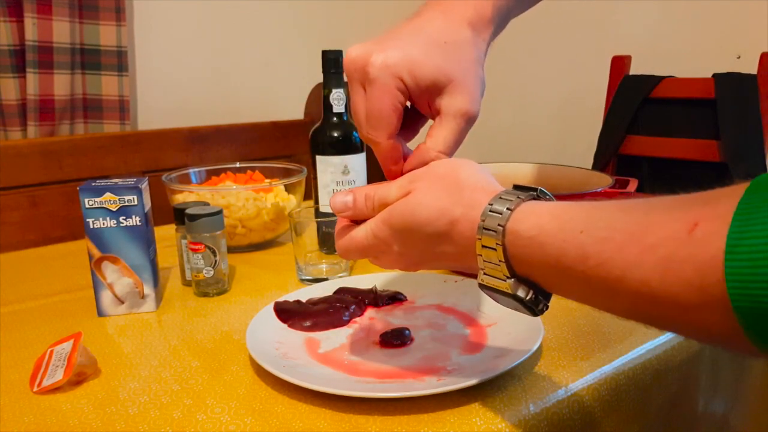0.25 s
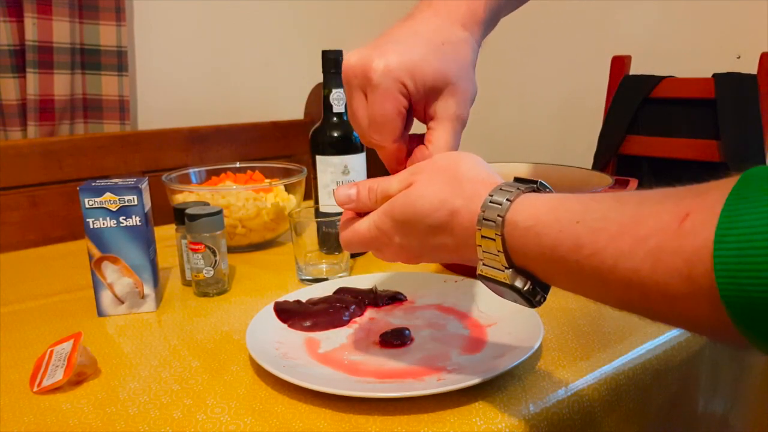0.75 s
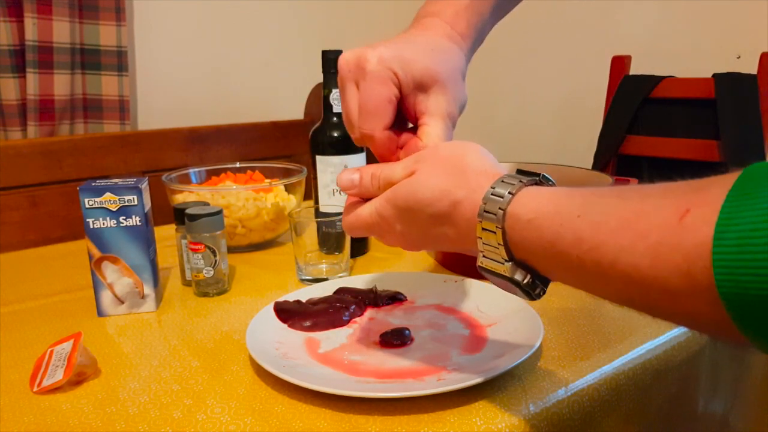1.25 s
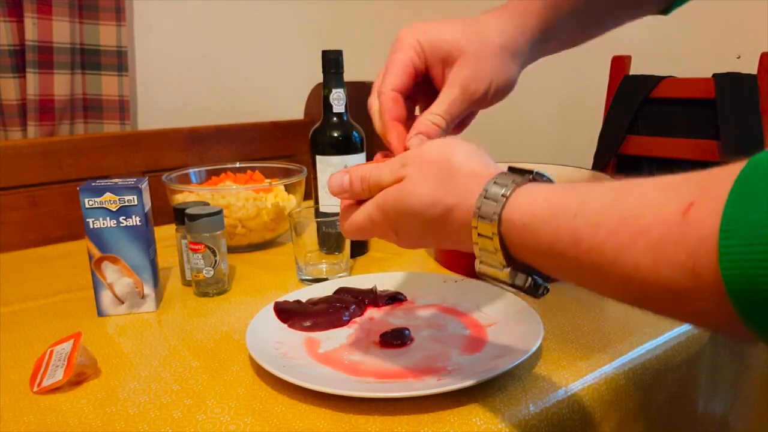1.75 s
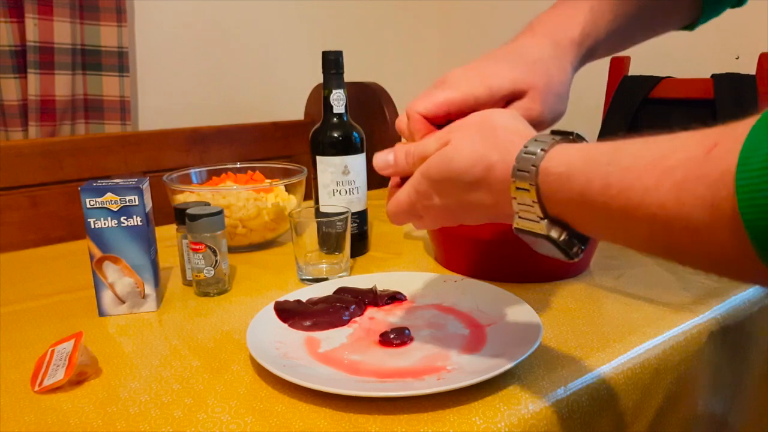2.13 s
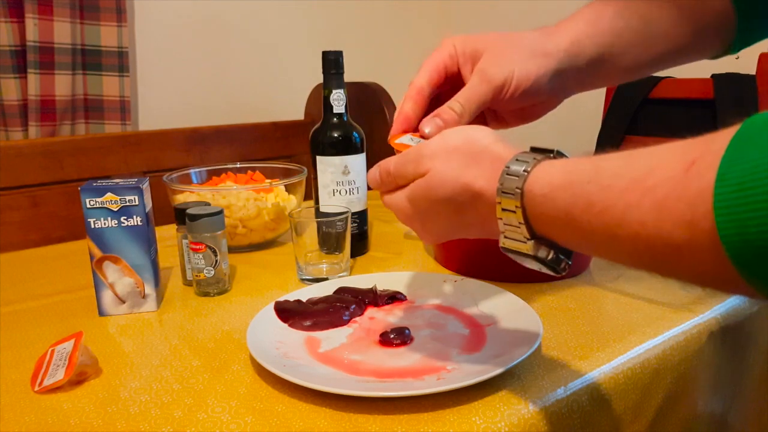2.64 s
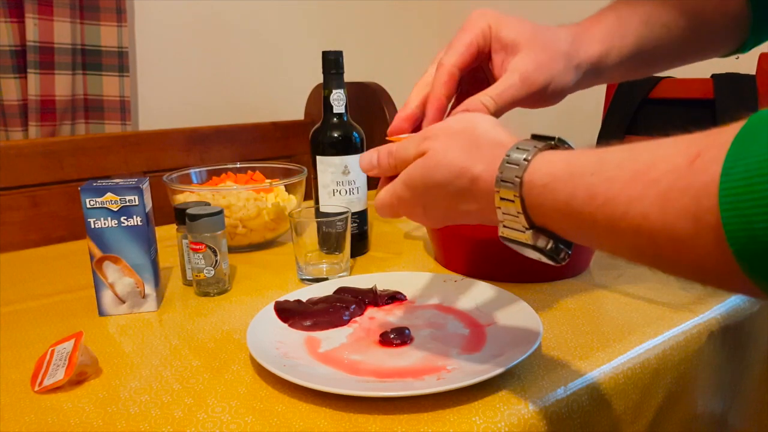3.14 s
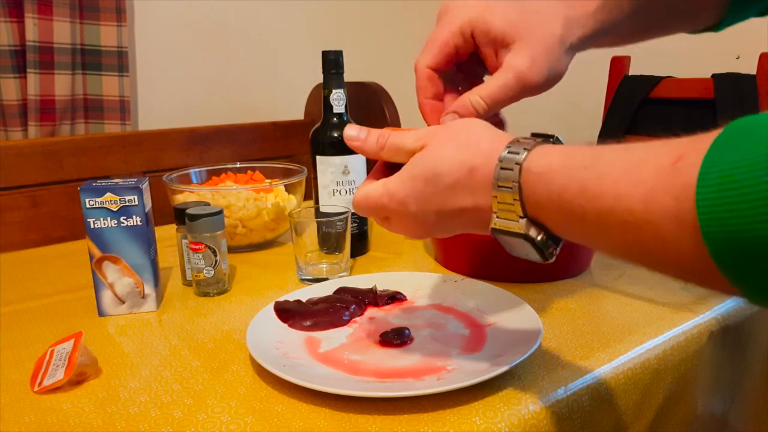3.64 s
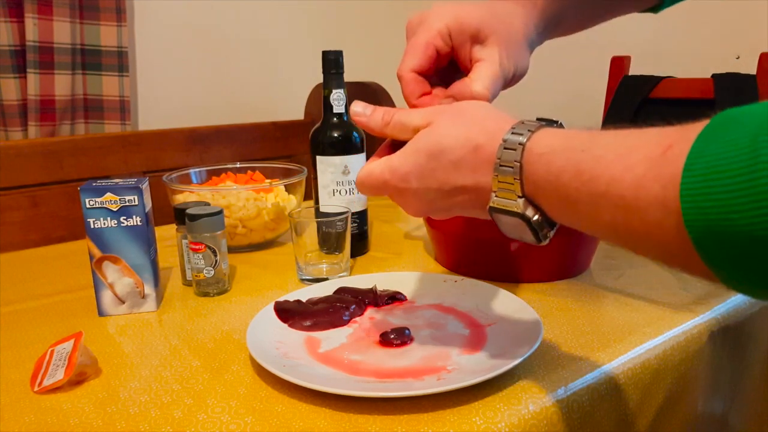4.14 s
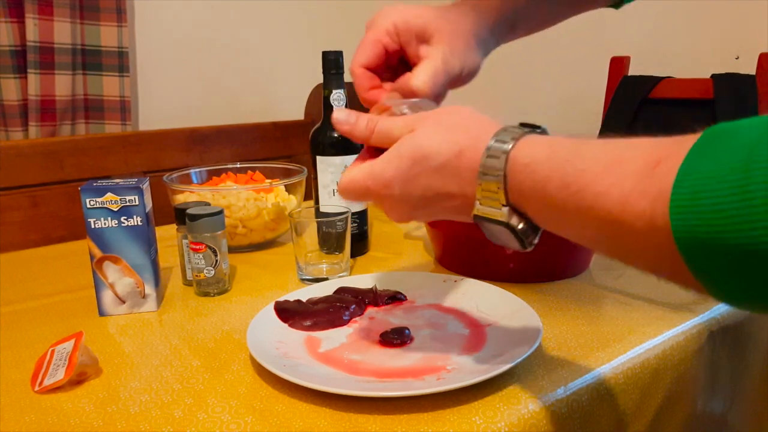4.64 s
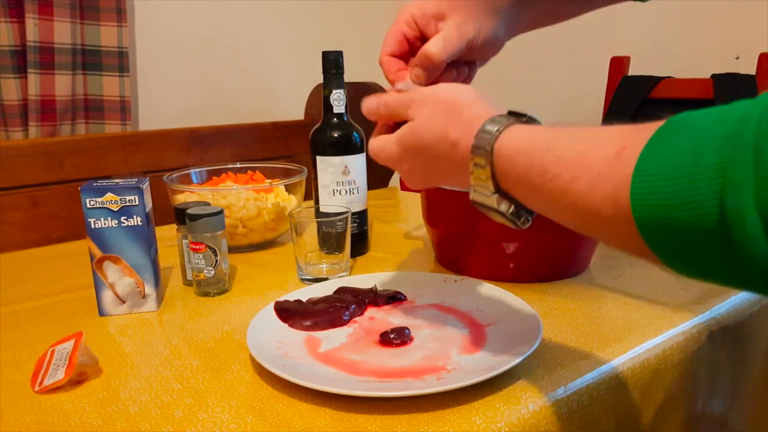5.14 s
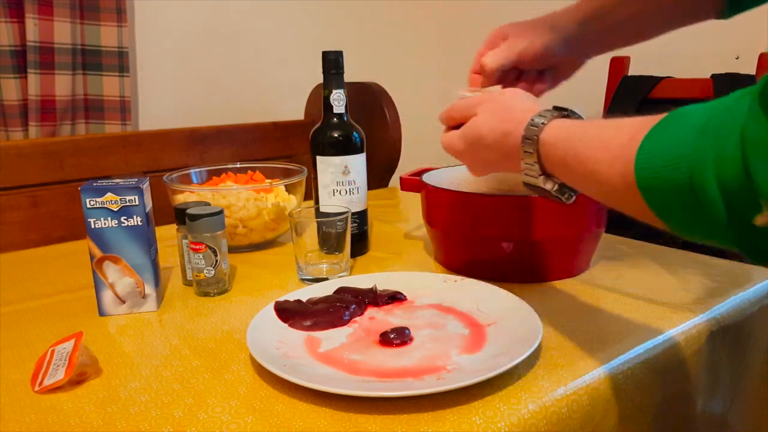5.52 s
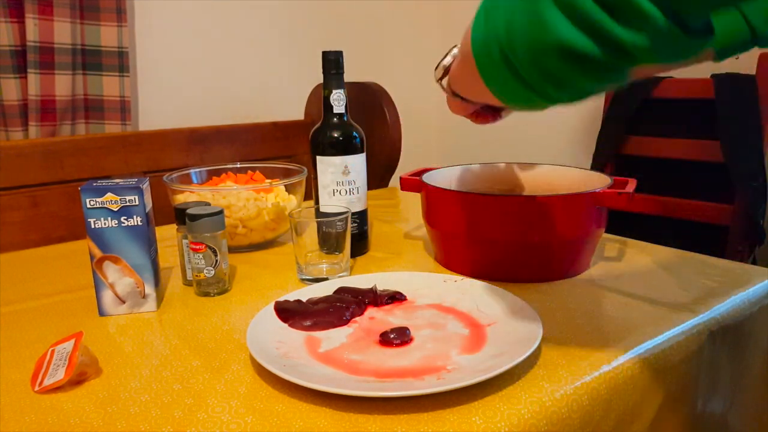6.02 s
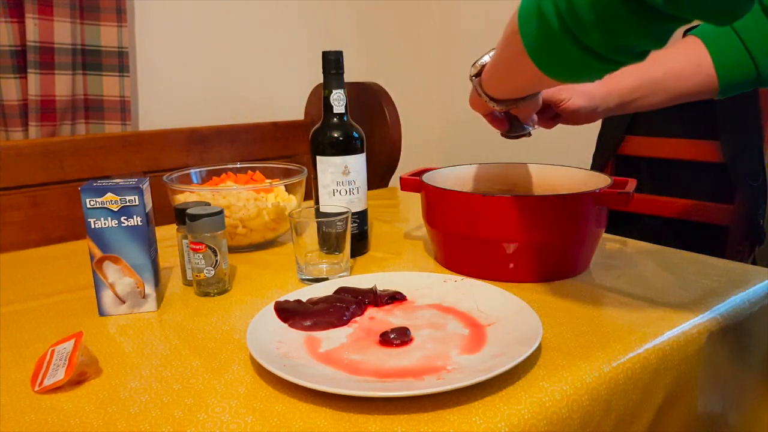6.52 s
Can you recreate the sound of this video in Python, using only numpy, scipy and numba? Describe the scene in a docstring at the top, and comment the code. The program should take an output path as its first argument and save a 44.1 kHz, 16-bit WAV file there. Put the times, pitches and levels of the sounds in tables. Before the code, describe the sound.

Stiff little wrapper crinkles and snaps close by in a quiet kitchen, with dense crackling around three seconds and one sharp tear.

```python
"""A small kitchen, two-port microphone a metre from hands that unwrap a crumbly cube over a table.
Throughout: house rumble, narrow bands of appliance hum, a steady whine and microphone hiss.
From 0.35 s creases of the stiff wrapper snap as short rings and clicks, with rustle between them;
near 1.9 and 2.25 s low knocks come through the table; near 4.64 s the wrapper tears once, loudly,
as a dense run of clicks. Sparser snaps follow to 6.6 s; the walls answer snaps, rustle and tear."""
import sys
import numpy as np
from scipy import signal
from scipy.fft import rfft, irfft, next_fast_len
from scipy.io import wavfile
from scipy.ndimage import uniform_filter1d, minimum_filter1d
from numba import njit

SR = 44100
rng = np.random.default_rng(int(sys.argv[2]) if len(sys.argv) > 2 else 0)


def put_to_file(sound):
    """Save the sound as 16-bit audio at rate SR, in the file named by the first command-line argument."""
    columns = np.atleast_2d(sound).T  # one column per channel
    safe = np.clip(columns, -1, 1)
    whole_steps = np.round(safe * 32767)
    wavfile.write(sys.argv[1], SR, whole_steps.astype(np.int16))


N = 298733  # samples

TICK_HZ = 11600  # centre of the bright tick in snaps and rustle
SPOTS = 4  # places of the hands that the walls answer differently


def undb(db):
    """Gain of a level in dB."""
    return 10 ** (np.asarray(db, float) / 20)


def unit(x):
    """Scale to rms 1."""
    return x / np.sqrt(np.mean(x ** 2))


def on_log(table, hz):
    """Read (frequency [Hz], value) points on a log-frequency axis."""
    points_hz, values = np.array(table).T[:2]
    return np.interp(np.log(np.maximum(hz, 1)), np.log(points_hz), values)


def shape(x, gain):
    """Multiply the spectrum by gain(Hz)."""
    n = next_fast_len(x.shape[-1])
    hz = np.arange(n // 2 + 1) * SR / n
    return irfft(rfft(x, n) * gain(hz), n)[..., :x.shape[-1]]


def resonate(x, hz, width_hz):
    """Two-pole resonance, gain 1 at the centre."""
    return signal.lfilter(*signal.iirpeak(hz, hz / width_hz, fs=SR), x)


@njit
def sweep(x, g, q):
    """State-variable band-pass whose centre moves: g = tan(pi centre / SR)."""
    y, band, low = np.empty(len(x)), 0., 0.
    for i in range(len(x)):
        v = (band + g[i] * (x[i] - low)) / (1 + g[i] * (g[i] + 1 / q))
        band = 2 * v - band
        low = low + 2 * g[i] * v
        y[i] = v / q
    return y


def fade(t, t60):
    """Decay that loses 60 dB in t60 s."""
    return np.exp(-np.log(1000) * t / t60)


def bout(t, start_s, hold_s, db, rise_db_per_s, fall_db_per_s):
    """Gain that swells to a level, holds it and dies away."""
    before_s = np.maximum(start_s - t, 0)
    after_s = np.maximum(t - start_s - hold_s, 0)
    return undb(db - rise_db_per_s * before_s - fall_db_per_s * after_s)


def crackle(rate, scatter_db, size=N):
    """Random clicks of either sign, rate per s, of scattered size; rms 1."""
    lot = rng.random(size) * SR / rate
    sizes = undb(scatter_db * rng.standard_normal(size))
    return unit((lot < 1) * np.sign(lot - .5) * sizes)


def kitchen():
    """Rumble shared by both ports in the bass, wavering bands of hum, and each microphone's own hiss."""
    # rumble of the house: (frequency [Hz], level [dB per Hz])
    air_colour = [(15, -39), (25, -15.5), (39, -5.5), (60, -17), (80, 0), (100, 0.5), (167, -2.5), (219, 0),
                  (305, -4), (400, -5), (491, -4), (840, -21.5), (1100, -33.5), (1430, -47.5)]
    # likeness of the rumble at the two ports: (frequency [Hz], left-right correlation [0-1])
    likeness = [(30, 0.8), (300, 1), (640, 0.5), (1200, 0)]
    # appliance hum: (frequency [Hz], width [Hz], rms level [dB])
    hum_bands = [(39.54, 1.5, -83.5), (102, 7.2, -69.5), (215.4, 35, -67.5), (357.5, 4.7, -70.5),
                 (1227, 34, -83.5)]
    # microphone hiss: (frequency [Hz], level [dB per Hz])
    hiss_colour = [(590, -43.5), (1000, -13), (1240, -0.5), (1390, -12), (3190, -20), (4990, -13.5),
                   (8760, -22), (15200, -14.5), (15900, -19), (16500, -41.5)]
    air_db, hiss_db = -60, -71.5  # rms
    whine_hz, whine_db = 1226., -80.  # steady appliance tone, rms
    background_pan_db = -1.3  # left minus right
    sides = np.array([[1], [-1]])

    def mid_side_gain(f):
        like = np.clip(on_log(likeness, f), 0, 1)
        return undb(on_log(air_colour, f)) * np.sqrt(1 + sides * like)

    mid, side = shape(rng.standard_normal((2, N)), mid_side_gain)
    air = undb(air_db) * unit(mid + sides * side)
    shake = rng.standard_normal(N)
    hum = sum(undb(db) * unit(resonate(shake, hz, width_hz)) for hz, width_hz, db in hum_bands)
    whine = undb(whine_db) * np.sqrt(2) * np.sin(2 * np.pi * whine_hz * np.arange(N) / SR)
    hiss = shape(rng.standard_normal((2, N)), lambda f: undb(on_log(hiss_colour, f)))
    background = air + hum + whine + undb(hiss_db) * unit(hiss)
    return background * undb(sides * background_pan_db / 2)


def thuds():
    """Low knocks through the table top: decaying sines."""
    # knocks: (time [s], frequency [Hz], starting level [dB], t60 [s])
    knocks = [(1.89, 124, -44, 0.16), (2.25, 38.4, -52, 0.21)]
    t = np.arange(N) / SR
    out = np.zeros(N)
    for s, hz, db, t60 in knocks:
        since = np.maximum(t - s, 0)
        out += undb(db) * np.sin(2 * np.pi * hz * since) * fade(since, t60)
    return out


def walls(x):
    """Two nearly separate diffuse tails, one a port: each band of noise dies at its own rate."""
    # decay of the room: (frequency [Hz], t60 [s])
    room_t60 = [(700, 0.16), (1500, 0.3), (3000, 0.27), (6000, 0.27), (12000, 0.23)]
    t = np.arange(SR // 2) / SR
    between = [np.sqrt(a[0] * b[0]) for a, b in zip(room_t60, room_t60[1:])]
    edges = [300] + between + [20000]
    noise = rng.standard_normal((3, len(t)))
    noise = 0.19 * noise[0] + 1.8 * noise[1:]  # a little is common to both ports
    tail = sum(shape(noise, lambda f: (f >= lo) & (f < hi)) * fade(t, t60)
               for lo, hi, (_, t60) in zip(edges, edges[1:], room_t60))
    # early on the echoes come in clumps
    steps = np.repeat(rng.standard_normal(len(t) // 64 + 1), 64)[:len(t)]
    clumps = uniform_filter1d(steps, 48)
    build_up = np.clip(t / .004, 0, 1)
    tail = tail * build_up * undb(4.0 * clumps * fade(t, .4))
    tail = tail / np.sqrt(np.sum(tail ** 2) / 2)
    return signal.fftconvolve(x[None], tail, axes=1)[:, :N]


def rustle():
    """Wrapper slides in the fingers: bouts of tiny random creases, from dull folds to sharp crackle."""
    # bouts: (start of the hold [s], hold [s], level ahead of the mix [dB], brightness [0-1],
    #         pitch of the folds [Hz], sizzle relative to the level [dB])
    bouts = [(0.352, 0.24, -65, 0.37, 1800, -31), (1.228, 0.1, -65.5, 0.12, 2500, -10),
             (1.404, 0.15, -95, 0.8, 2200, -3), (1.7, 0.2, -67.5, 0.62, 2030, -17),
             (2.052, 0.036, -52, 0.5, 1900, -19), (2.238, 0.31, -66, 0.4, 1880, -15),
             (2.703, 0.21, -66.5, 0.46, 2000, -13), (3.08, 0.024, -52, 0.17, 2700, -14),
             (3.424, 0.051, -58.5, 0, 2800, -17), (3.589, .2, -67.5, 0.3, 2400, -30),
             (3.95, 0.31, -73.5, 0.17, 2150, -15), (4.58, 0.044, -56.5, 0.04, 2200, -15),
             (5.119, .1, -75, .15, 2936, -16.5), (5.258, 0.022, -75, .2, 2990, -18),
             (5.424, 0.0197, -56, 1, 3000, 6.5), (5.487, .1, -60.5, 0.8, 2200, -42),
             (5.722, 0.032, -66, 0.9, 2280, -3.5), (5.843, 0.048, -72, 0.23, 2350, -31),
             (6.014, 0.021, -59, .8, 2700, -35), (6.33, 0.076, -66, 0.68, 2250, -17),
             (6.64, 0.025, -69, .3, 1780, -14)]
    grip_db_per_s, slack_db_per_s = 251, 132  # how fast a bout swells and dies
    t = np.arange(N) / SR
    gain = sum(bout(t, s, max(hold_s, 0), db, grip_db_per_s, slack_db_per_s)
               for s, hold_s, db, *_ in bouts)
    # the colour glides from the middle of one bout to the next
    s, hold_s, _, *colour = np.transpose(bouts)
    bright, hz, sizzle_db = (np.interp(t, s + hold_s / 2, c) for c in colour)
    bright = np.clip(bright, 0, 1)
    g = np.tan(np.pi * hz / SR)
    folds = crackle(350., 7.0)
    dull = unit(sweep(sweep(folds, g, 1.0), g, 1.0))
    sharp = unit(resonate(crackle(1200., 5.8), 4600., 5700.0))
    sizzle = resonate(resonate(crackle(2000., 4.0), TICK_HZ, 7000.), TICK_HZ, 7000.)
    return gain * ((1 - bright) * dull + bright * sharp + undb(sizzle_db) * unit(sizzle))


def tear():
    """Fibres part in a dense run of clicks and ring the taut sheet; phase differs between the ports."""
    # colour of the tear: (frequency [Hz], level [dB per Hz])
    rip_colour = [(180, -69), (300, -37), (730, -23.5), (1290, -21.5), (2210, -13), (2400, -11.5),
                  (2840, -1), (3240, -16), (3900, -6), (5930, -9.5), (7260, -14.5), (14900, -11.5),
                  (16500, -34.5)]
    # ringing of the taut wrapper: (frequency [Hz], level [dB], t60 [s])
    sheet_modes = [(2800, 2, .11), (2880, 2.5, 0.03), (4300, -5, 0.09), (5910, -2.5, .07)]
    # place of the tear between the ports: (frequency [Hz], left minus right [dB])
    rip_pan = [(60, 11.5), (110, -7.5), (200, -0.5), (380, -5), (700, -2), (1290, -2), (2380, -7),
               (4400, -2.5), (8120, 9.5), (15000, -3.5)]
    tear_s, hold_s, tear_db = 4.638, .0075, -9.5  # level of the clicks ahead of their colour
    gather_db_per_s, stop_db_per_s = 1399.5, 2201
    give_db, walls_db = 14.5, -4.5  # jump in level when the sheet gives way; send to the walls
    span = slice(int(tear_s * SR) - SR // 10, int(tear_s * SR) + SR // 2)
    t = np.arange(span.start, span.stop) / SR
    swell = bout(t, tear_s, hold_s, tear_db, gather_db_per_s, stop_db_per_s)
    rip = swell * crackle(12000., 5.5, size=len(t))
    rip = rip * undb(-give_db * (t < tear_s))
    colour_rms = np.sqrt(np.mean(undb(on_log(rip_colour, np.linspace(0, SR / 2, 999))) ** 2))
    sound = shape(rip, lambda f: undb(on_log(rip_colour, f)) / colour_rms)
    sound = sound + sum(undb(db) * resonate(rip, hz, np.log(1000) / np.pi / t60)
                        for hz, db, t60 in sheet_modes)
    # a thin sheet moves no bass
    sound = shape(sound, lambda f: 1 / np.sqrt(1 + (280 / np.maximum(f, 1)) ** 4))

    def turn(f):  # phase lag of the right port, growing from 4.5 to 9 kHz
        octaves = np.clip(np.log2(np.maximum(f, 1) / 4500), 0, 1)
        return np.exp(-1j * (.5 + 1.6 * octaves))

    out = np.zeros((3, N))
    out[0, span] = shape(sound, lambda f: undb(on_log(rip_pan, f) / 2))
    out[1, span] = shape(sound, lambda f: undb(-on_log(rip_pan, f) / 2) * turn(f))
    out[2, span] = sound * undb(walls_db)
    return out[:2], out[2]


def snaps():
    """A crease flips: the fold swells and rings briefly, with a crack and a bright tick at the start."""
    # creases that snap, before echoes and port colour: (time [s], fold peak [dB], pitch of the fold [Hz],
    #         crack peak [dB], bright tick peak [dB], left minus right [dB])
    creases = [(0.3534, -46.5, 1220, -68, -77, -2), (0.406, -51, 1250, -65, -75, -1),
               (.409, -56, 2300, -44.5, -52, 1.2), (.5123, -45, 1430, -51, -65, -5),
               (0.5779, -39, 1710, -81, -75, -2.5), (.5929, -35.5, 1450, -82, -78, -2.5),
               (1.1954, -57, 1810, -75, -64, -10), (1.2409, -44, 2040, -44.5, -66, -6),
               (1.245, -42.5, 3100, -62, -66, 1), (1.3257, -44, 1760, -34.5, -71, 16),
               (1.512, -36, 1690, -47, -73, -1), (1.628, -39, 1610, -41.5, -54, -2.5),
               (1.7595, -33.5, 1480, -30, -31.5, 0), (1.975, -57, 1600, -70, -67, -7),
               (2.0257, -30.5, 1600, -44, -49, -2), (2.0316, -28, 2140, -32.5, -59, -1),
               (2.047, -31, 1360, -27, -56, -.6), (2.0662, -30.5, 1760, -42, -40, -5),
               (2.1704, -41, 1580, -46, -64, -6), (2.2121, -37, 1680, -40.5, -55, -2.2),
               (2.312, -50.5, 1620, -70, -74, -4), (2.358, -60, 1590, -48.5, -62, 0),
               (2.3954, -50, 1580, -47, -51, -1.5), (2.4568, -40, 1450, -42.5, -60, -4),
               (2.4996, -30, 1560, -34.5, -51, -4.5), (2.596, -57, 1030, -51, -60, -2),
               (2.7028, -48.5, 1680, -77, -77, -4), (2.7325, -46.5, 1110, -39, -46, -2),
               (2.8013, -45.5, 1420, -59, -70, -8), (2.8506, -40.5, 1240, -45, -34, -1),
               (2.8508, -30.5, 2800, -30.5, -54, -2.5), (2.9524, -50, 1220, -75, -74, -2),
               (2.9976, -43.5, 1390, -48, -75, -4), (3.026, -28, 1600, -33.5, -52, -3),
               (3.0508, -37, 1390, -35, -50, 4), (3.0824, -45, 1490, -35.5, -47, 6),
               (3.1076, -35.5, 1520, -38, -61, -2.2), (3.1402, -28, 1670, -34, -48, -2),
               (3.1616, -36.5, 2260, -53, -66, -13), (3.184, -32.5, 1750, -37.5, -52, 0),
               (3.2464, -26, 1704, -24.5, -65, -1), (3.266, -34, 1410, -56, -58, -10),
               (3.2824, -55, 1570, -53, -63, -3), (3.3048, -41, 1630, -37.5, -70, -8),
               (3.3621, -34, 1430, -33, -63, 2), (3.3739, -39, 1180, -35, -58, -8),
               (3.4401, -33.5, 2950, -47, -75, 0), (3.4492, -33, 2670, -35.5, -54, 0),
               (3.507, -49, 1270, -66, -71, 0), (3.6013, -48, 2250, -51, -64, 2),
               (3.7209, -48.5, 2630, -43.5, -53, -4), (3.8919, -49.5, 1400, -60, -78, -2.2),
               (3.9232, -39.5, 1540, -40, -55, -1), (4.0935, -42, 1700, -43.5, -69, -10),
               (4.2366, -38, 1800, -50, -72, -3), (4.5458, -54.5, 2840, -51, -66, -14),
               (4.5967, -31, 2720, -33, -46, -12), (4.8231, -25.5, 3980, -27.5, -70, 11.5),
               (4.9665, -41.5, 2850, -45, -48.5, -1.5), (4.9782, -55, 1290, -50, -70, -8),
               (5.107, -38, 2970, -41.5, -47.5, -2.2), (5.1731, -44.5, 3110, -41, -59.5, -4.5),
               (5.1844, -66, 3280, -63, -66, -2.2), (5.2493, -41.5, 2940, -58, -66, -1.5),
               (5.2579, -42, 2980, -39, -61, 0), (5.3563, -70, 3230, -47, -55, 1),
               (5.3712, -65, 3180, -40, -58, 10), (5.4027, -69, 1230, -40, -58, 6),
               (5.413, -66, 3170, -40, -51, -1.5), (5.4213, -74, 2970, -31, -42, -2),
               (5.4296, -62, 3190, -30.5, -46, 3), (5.461, -56, 2400, -42, -47, -4),
               (5.4864, -27, 2963, -19.5, -20, -9), (5.498, -56, 3340, -38, -45, 4),
               (5.698, -48.5, 2280, -51, -58, -8), (5.7691, -51, 2290, -53.5, -61.5, -3.8),
               (5.8171, -47, 2210, -43.5, -56, -2), (5.825, -47.5, 2300, -54, -66, -1),
               (5.9938, -43.5, 2970, -39.5, -54.5, -1.2), (6.3413, -53.5, 3080, -61, -77, -1.2),
               (6.3702, -51, 2915, -42, -61, -1), (6.625, -54, 1700, -44, -58.5, -4)]
    # echoes of the table top and nearest walls: (delay [s], level [dB])
    near_echoes = [(.0024, -14.5), (.0065, -17.5), (0.0142, -19), (0.021, -20)]
    fold_cycles, ring_scatter = 7.5, .2  # cycles until 60 dB down, and how folds differ in that
    crack_centre_hz, crack_scatter = 5135, .05
    walls_db = 0.6  # send to the walls
    upper_db, upper_follows = -5.5, 0.51  # upper mode of a fold; dB lost per dB of crack below fold
    upper_db_per_octave = -8  # small high folds (above 1700 Hz) have little upper mode
    t = np.arange(768) / SR
    chance = rng.standard_normal((len(creases), len(t)))
    direct, send = np.zeros((2, N)), np.zeros((SPOTS, N))
    for (s, fold_db, hz, crack_db, tick_db, pan_db), grit in zip(creases, chance):
        # the fold has a weaker upper mode, stronger when the crack is sharp
        mode_db = upper_db + upper_follows * min(crack_db - fold_db, 0)
        mode_db = mode_db + upper_db_per_octave * max(np.log2(hz / 1700), 0)
        ring = np.sin(2 * np.pi * hz * t) + undb(mode_db) * np.sin(2 * np.pi * 1.95 * hz * t)
        ring_t60 = fold_cycles / hz * np.exp(ring_scatter * grit[1])
        fold = -ring * (1 - np.exp(-hz * t)) * fade(t, ring_t60)
        # one sharp jolt, 12 samples in, amid fading grit
        jolt = (np.arange(len(t)) == 12) + 0.45 * grit * fade(t, .004)
        crack_hz = crack_centre_hz * (1 + crack_scatter * grit[0])
        crack = resonate(resonate(jolt, crack_hz, .8 * crack_hz), crack_hz, .8 * crack_hz)
        tick = resonate(resonate(jolt, TICK_HZ, 8300.0), TICK_HZ, 8300.0)
        parts = zip((fold_db, crack_db, tick_db), (fold, crack, tick))
        sound = sum(undb(db) * part / np.abs(part).max() for db, part in parts)
        i = int(s * SR)
        direct[:, i:i + len(t)] += undb(np.array([[pan_db], [-pan_db]]) / 2) * sound
        spot = int(abs(grit[2]) * 1000) % SPOTS  # drawn at random
        send[spot, i:i + len(t)] += undb(walls_db) * sound
    # hard surfaces nearby answer as separate echoes, from the other side
    echoes = sum(undb(db) * np.roll(direct[::-1], int(s * SR), axis=1) for s, db in near_echoes)
    return direct + echoes, send


def scene():
    """All sources at the two ports."""
    # colour of the ports for near sounds: (frequency [Hz], level [dB])
    port_colour = [(300, 12.5), (800, 3.5), (1200, 4), (6000, -0.5), (8800, -2), (12000, 2.5)]
    left_lag = 2  # samples; the hands are to the right
    (snap, snap_send), (rip, rip_send), slide = snaps(), tear(), rustle()
    hands = snap + undb(-15) * slide
    hands = np.array([np.roll(hands[0], left_lag), hands[1]])
    reflected = walls(rip_send + undb(1.5) * slide) + sum(walls(send) for send in snap_send)
    wrapper = hands + rip + reflected
    return shape(wrapper, lambda f: undb(on_log(port_colour, f))) + thuds() + kitchen()


def record(dry):
    """The recorder cuts the top, limits the loudest peaks quickly, and cuts the top again."""
    top_hz, ceiling, limit_s = 15900, .85, .002
    low_pass = signal.ellip(12, .1, 90, top_hz, fs=SR, output="sos")
    sound = signal.sosfilt(low_pass, dry)
    k = int(limit_s * SR)
    room = np.minimum(1, ceiling / (np.abs(sound).max(axis=0) + 1e-9))
    # the gain drops ahead of a peak and is smoothed
    gain = uniform_filter1d(minimum_filter1d(room, size=2 * k + 1), size=k)
    return signal.sosfilt(low_pass, sound * gain)


dry = scene()
out = record(dry)
put_to_file(out)
```